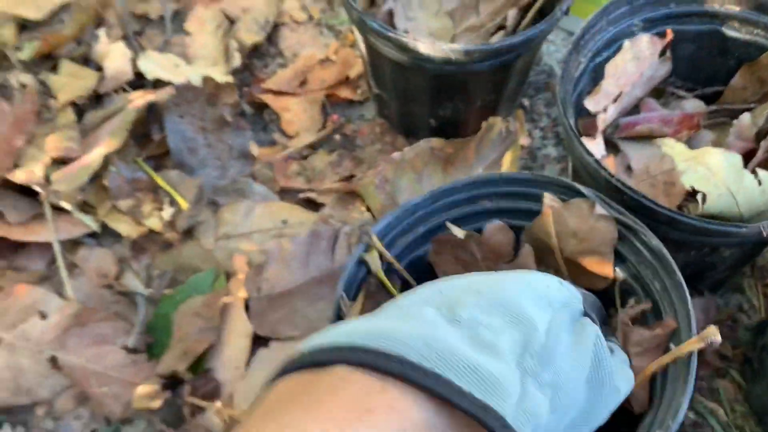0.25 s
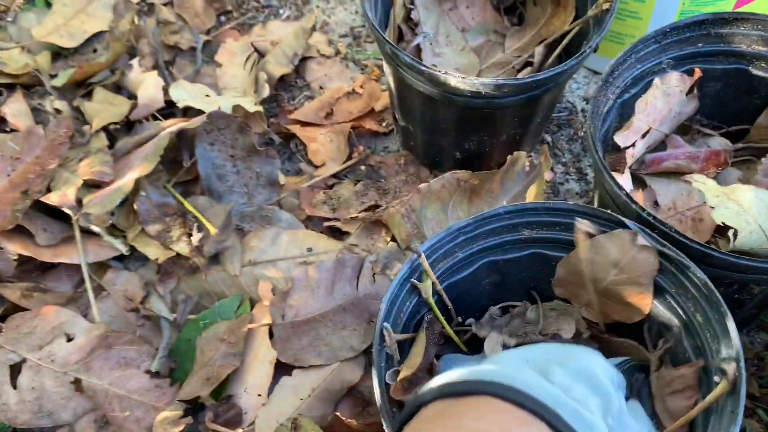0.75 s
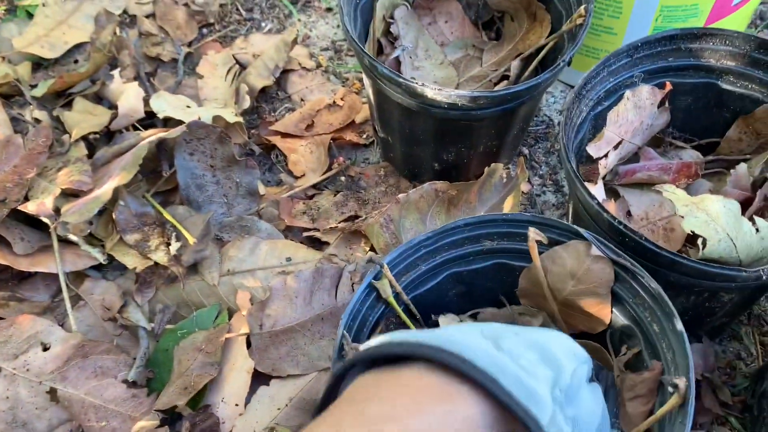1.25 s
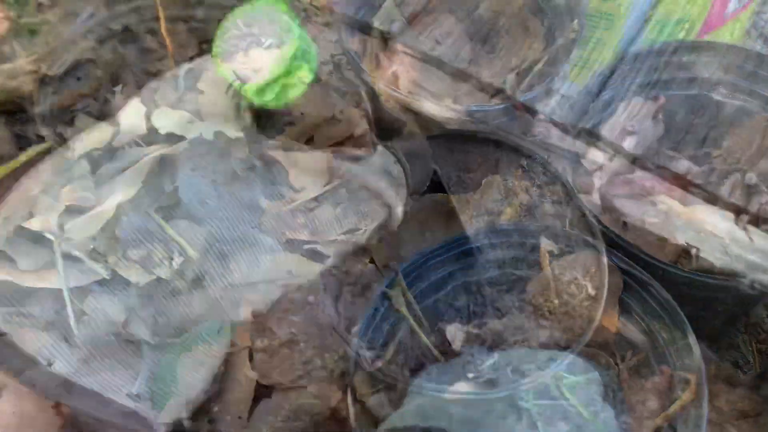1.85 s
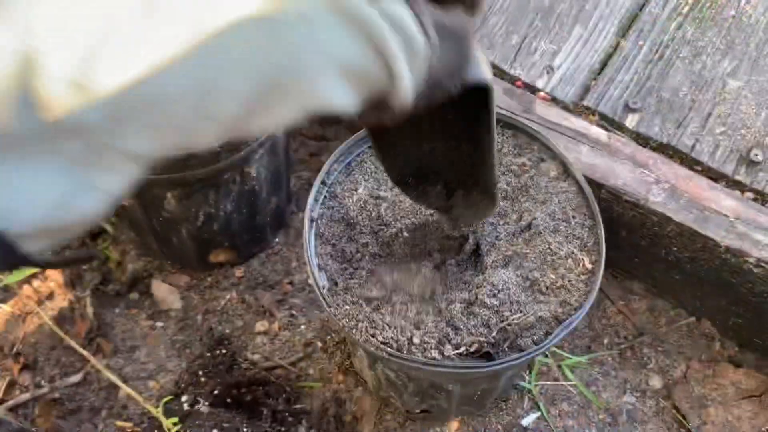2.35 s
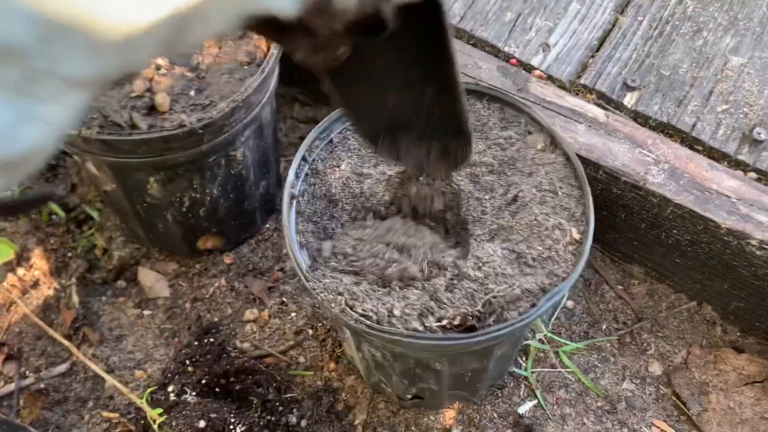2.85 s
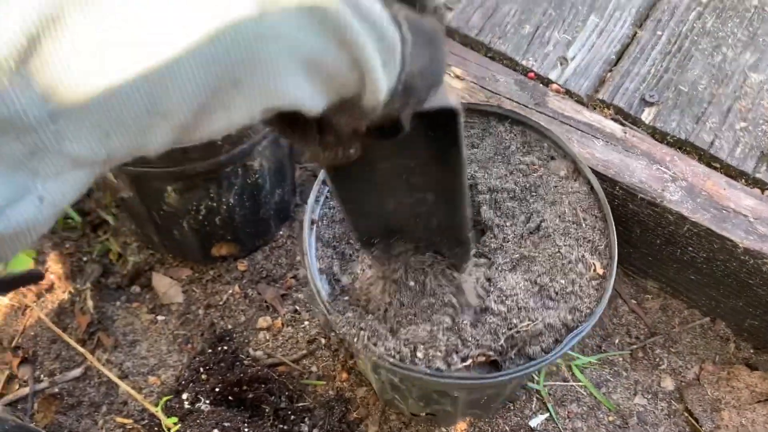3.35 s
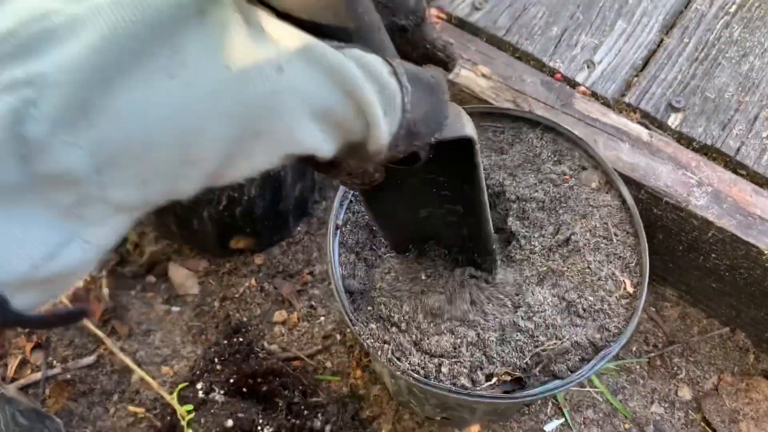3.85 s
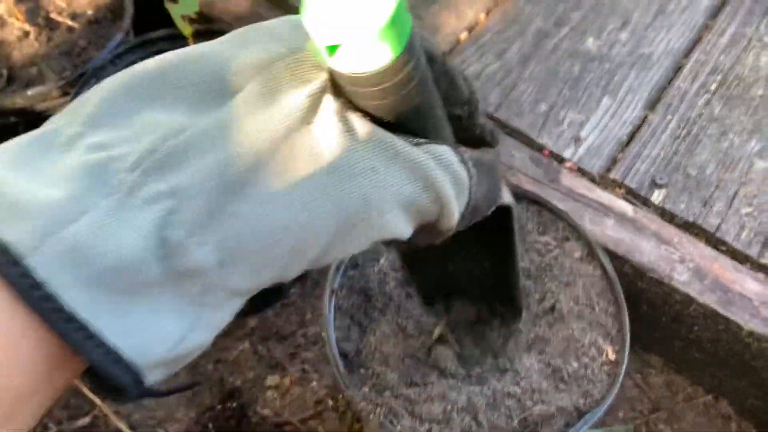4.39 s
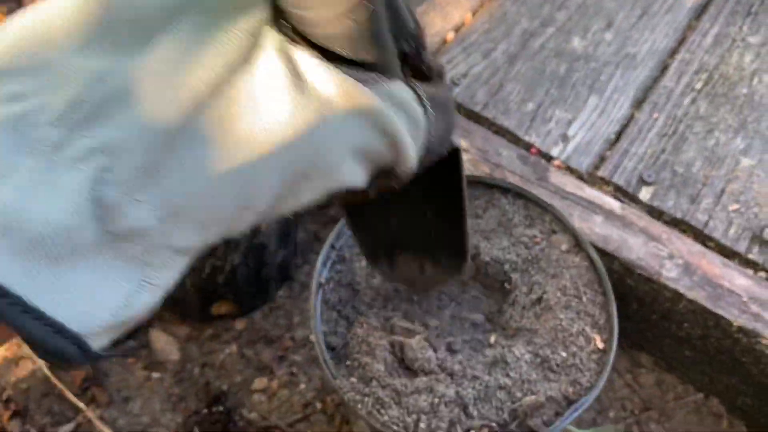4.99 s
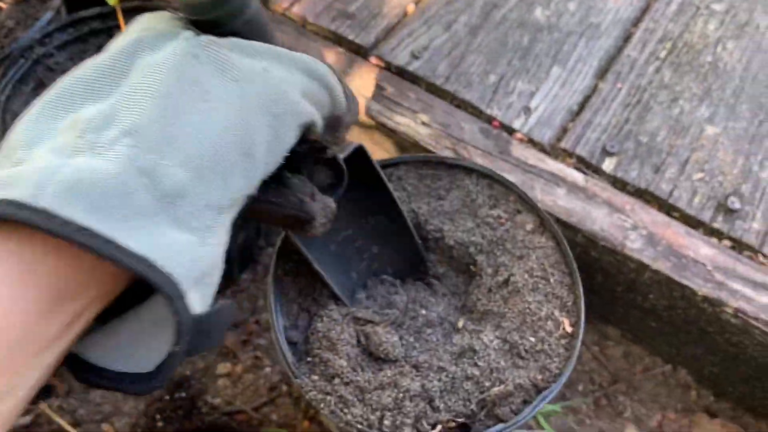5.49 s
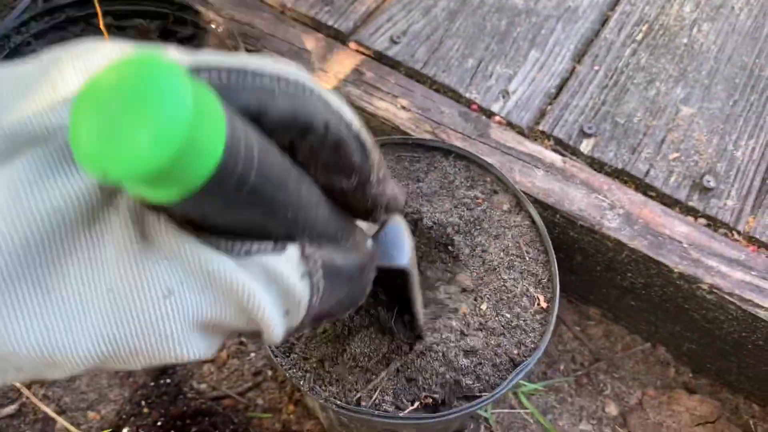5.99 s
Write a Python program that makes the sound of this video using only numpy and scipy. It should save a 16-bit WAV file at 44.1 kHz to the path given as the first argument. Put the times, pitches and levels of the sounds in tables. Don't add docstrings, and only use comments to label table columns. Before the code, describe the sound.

Close up outdoors, a gloved hand crushes dry leaves in a plastic pot, with fizzing, sharp snaps and a slightly hollow body over a low machine hum. After about two seconds the sound fades across to a steel trowel cutting sandy soil in separate gritty strokes, with pebble ticks and trickling sand. Faint birds and far traffic rumble sit behind. Phone-like stereo.

```python
import sys
import numpy as np
from scipy import signal
from scipy.fft import rfft, irfft, next_fast_len
from scipy.io import wavfile
from scipy.ndimage import uniform_filter1d, map_coordinates

SR = 44100
rng = np.random.default_rng(int(sys.argv[2]) if len(sys.argv) > 2 else 0)


def master_out(mix):
    frames = np.transpose(np.atleast_2d(mix))
    ceiling = np.clip(frames, -1, 1)
    pcm = np.round(ceiling * 32767).astype(np.int16)
    wavfile.write(sys.argv[1], SR, pcm)


def how_loud(loudness_db):
    steps = np.asarray(loudness_db, float) / 20
    return 10 ** steps


N = 274743


def unit(x):
    return x / np.sqrt(np.mean(x ** 2) + 1e-20)


def along(points, hz):
    f, value = np.transpose(points)
    return np.interp(np.log(hz + 1), np.log(f + 1), value)


def curves(rows):
    seconds, *columns = np.transpose(rows)
    return [np.interp(np.arange(N) / SR, seconds, column) for column in columns]


def fade(start_s, end_s):
    return np.clip((end_s - np.arange(N) / SR) / (end_s - start_s), 0, 1)


def wobble(rate):
    knots = rng.standard_normal(int(N * rate / SR) + 4)
    return map_coordinates(knots, [np.arange(N) * rate / SR])


def filtered(x, response):
    m = next_fast_len(N + SR // 4)
    return irfft(rfft(x, m) * response(np.fft.rfftfreq(m, 1 / SR)), m)[..., :N]


def band(x, lo_hz, hi_hz, ref_lo_hz, ref_hi_hz):
    hz, power = signal.welch(x[0], SR, nperseg=1024)
    inside = (hz > ref_lo_hz) & (hz < ref_hi_hz)
    ref = np.sqrt(power[inside].sum() * hz[1])
    return filtered(x, lambda f: 1 / (1 + (lo_hz / (f + 1)) ** 8) / (1 + (f / hi_hz) ** 8)) / ref


# frequency in Hz, lead of the left port in radians.
TREBLE_PORT_LEAD = [(7050, np.pi), (9350, 0), (11750, -np.pi), (14100, -2 * np.pi), (16400, -3 * np.pi)]


def ports(pair, lead, tilt, alike):
    lead_hz, lead_rad = np.transpose(lead + TREBLE_PORT_LEAD)

    def share(hz):
        angle = np.arccos(np.clip(along(alike, hz), 0, 1)) / 2
        return np.array([np.cos(angle), np.sin(angle)])

    def left_right(hz):
        balance = how_loud(along(tilt, hz) / 2 * (hz < TREBLE_PORT_LEAD[0][0]))
        half = balance * np.exp(.5j * np.interp(hz, lead_hz, lead_rad))
        return np.array([half, 1 / half])

    same, other = filtered(pair, share)
    return filtered(np.array([same + other, same - other]), left_right)


def whistle(rows):
    s, hz, db = np.transpose(rows)
    out = np.zeros(N)
    at = np.arange(max(int(s[0] * SR), 0), min(int(s[-1] * SR), N))
    phase = 2 * np.pi * np.cumsum(np.interp(at / SR, s, hz)) / SR
    out[at] = how_loud(np.interp(at / SR, s, db)) * np.sqrt(2) * np.sin(phase)
    return out


# frequency in Hz, density in dB per Hz.
RUMBLE_SPECTRUM = [(12, -42), (20, -12.5), (27, -48), (41, -6), (70, 2), (130, -2), (161, -19.5),
                   (229, -16), (300, -30), (390, -23.5), (660, -120)]
AIR_SPECTRUM = [(180, 0.0), (260, -5.6), (400, -14.2), (700, -21.5), (1100, -24.4), (1800, -30.9),
                (2400, -30.9), (4500, -37.4), (5600, -40.9), (7000, -40.8), (9000, -40.3), (11000, -42.7),
                (13500, -45.2), (15200, -48.2)]
# time in seconds, level in dB.
TRAFFIC_LEVEL = [(0.0, -53), (0.07, -40.5), (0.35, -47), (0.47, -44), (2.48, -49.5), (2.85, -45.5),
                 (2.98, -50), (3.49, -46), (4.68, -49), (5.43, -47), (6.23, -48)]
# time in seconds, pitch in Hz, level in dB.
MACHINE_HUM = [(0.0, 60.4, -54), (0.03, 57.43, -47), (1.4, 57.8, -45), (2.09, 58.7, -55), (2.2, 55.9, -65)]
# frequency in Hz, left over right in dB.
AIR_BALANCE = [(60, -2.4), (200, -2.2), (500, -1), (2000, -.5)]
# frequency in Hz, likeness from 0 to 1.
AIR_LIKENESS = [(60, .98), (130, .87), (300, .6), (600, .15), (5000, .3), (7000, .88), (9000, .97)]


def background():
    rumble = unit(filtered(rng.standard_normal((2, N)), lambda hz: how_loud(along(RUMBLE_SPECTRUM, hz))))
    air_shape = lambda hz: how_loud(along(AIR_SPECTRUM, hz)) * (hz > 150) * (hz < 15150)
    air = unit(filtered(rng.standard_normal((2, N)), air_shape))
    traffic = how_loud(curves(TRAFFIC_LEVEL)[0] - 1.5) * rumble
    first_scene_db = 4 * fade(1.3, 1.87)
    bed = traffic + how_loud(-60 + first_scene_db + 0.4 * wobble(2.46)) * air
    hum = whistle(MACHINE_HUM) * fade(1.64, 2.36)
    hum_balance = how_loud(np.array([[-1.4], [1.4]]))
    return ports(bed, [(0, 0), (4700, 0)], AIR_BALANCE, AIR_LIKENESS) + hum * hum_balance


# time in seconds, pitch in Hz, level in dB.
BIRD_SLURS = [
    [(1.33, 3200, -85), (1.37, 3113, -77), (1.46, 3080, -80), (1.5, 3060, -88)],
    [(3.27, 4050, -79), (3.31, 3730, -78), (3.37, 3360, -74), (3.42, 3080, -73.5), (3.49, 3030, -94),
     (3.55, 3060, -92)],
    [(3.89, 3290, -75), (3.93, 3270, -89), (4.01, 3200, -88), (4.06, 3200, -86)],
    [(6.13, 4300, -90), (6.17, 4070, -84), (6.22, 4370, -84)],
]
# start in seconds, level in dB, pitch factor.
BIRD_CHIRPS = [
    (4.28, -74, 1.03),
    (4.447, -73.5, 1.02),
    (4.613, -73.5, 1.04),
    (4.784, -73.5, 1),
    (5.615, -76, 1.05),
    (5.781, -77, 1.15),
    (5.985, -80, 1.34),
    (6.084, -75, 1.24),
]
# start in seconds, length in seconds, first pitch in Hz, last pitch in Hz, level in dB.
CHIRP_GLIDES = [
    (0, .035, 2990, 1953, 4.5),
    (0.009, 0.04, 3044, 2810, -4),
]


def birds():
    song = sum(whistle(rows) for rows in BIRD_SLURS)
    for s, db, pitch in BIRD_CHIRPS:
        for start, length, from_hz, to_hz, voice_db in CHIRP_GLIDES:
            u = np.linspace(0, 1, 5)
            shape = voice_db - 2.0 - 40 * (u - .5) ** 2
            glide = pitch * (from_hz + (to_hz - from_hz) * u)
            song += whistle(np.transpose([s + start + length * u, glide, db + shape]))
    song = song * (1 + .9 * np.array([wobble(220), wobble(220)]))
    garden_t60 = 0.27
    decay = how_loud(-60 * np.arange(SR // 2) / SR / garden_t60)
    tail = rng.standard_normal((2, SR // 2)) * decay
    echo = signal.fftconvolve(song, tail / np.linalg.norm(tail[0]), axes=1)[:, :N]
    return song + how_loud(6.0) * echo


def chips(count, spread_db, cycles):
    at, pitch, size, *phases = rng.random((count, 5)).T
    hz = 450 * 33 ** pitch[:, None]
    t = np.arange(SR // 150) / SR
    size_db = -spread_db * np.log(size + 0.15)[:, None]
    fall = hz * how_loud(size_db - 60 * t * hz / cycles) * (1 - t / t[-1])
    where = ((at * N).astype(int)[:, None] + np.arange(len(t))).ravel()
    rings = [fall * np.sin(2 * np.pi * (hz * t + phase[:, None])) for phase in phases]
    return unit(np.array([np.bincount(where, ring.ravel(), N)[:N] for ring in rings]))


def patchy(x, depth_db):
    z = signal.stft(x, nperseg=512)[2]
    field = uniform_filter1d(rng.standard_normal(z.shape[1:]), size=3, axis=0)
    field = uniform_filter1d(field, size=4, axis=1)
    return signal.istft(z * how_loud(depth_db * unit(field)), nperseg=512)[1][:, :N]


def crunch(spectrum, rate, spread_db, life, clump_db, smooth, pieces):
    size_db = spread_db * np.minimum(rng.exponential(size=N), 2.6)
    hits = (rng.random(N) < rate / SR) * how_loud(size_db)
    grains = signal.fftconvolve(hits, how_loud(-60 * np.arange(SR // 30) / SR / life))[:N]
    bursts = (unit(abs(grains)) + smooth) * rng.standard_normal((2, N))
    clumped = patchy(bursts + pieces, depth_db=1.87) * how_loud(clump_db * wobble(45))
    return filtered(clumped, lambda hz: how_loud(along(spectrum, hz)))


def strokes(rows, rise, fall, follows=1, over_db=0, body=0):
    t = np.arange(0, N + 64, 32) / SR
    s, length, start_db, end_db, body_db = np.transpose(rows)[:, :, None]
    u = np.clip((t - s) / length, 0, 1)
    away = np.maximum(0, np.maximum((s - t) / rise, (t - s - length) / fall))
    top_db = np.maximum(start_db, end_db)
    swell_db = 20
    under_db = top_db - start_db - (end_db - start_db) * u + swell_db * away
    power = how_loud(top_db + body * body_db + over_db - follows * under_db) ** 2
    return np.interp(np.arange(N) / SR, t, np.sqrt(power.sum(axis=0)))


def snaps(events, lift_db, ring_lift_db, life):
    before = SR // 100
    out = np.zeros((2, N + SR))
    t = np.arange(-before, SR // 40) / SR
    bright = signal.butter(2, [4600, 13400], "band", fs=SR)
    after = np.maximum(t, 0)
    fall = how_loud(-60 * after / life) * (1 - np.exp(-after / 0.00028))
    lead_in = how_loud(-22) * np.exp(-abs(t) / 0.0022)
    for s, db, hz, ring_db in events:
        noise = rng.standard_normal((4, len(t)))
        crack = signal.lfilter(*bright, noise[:2]) * (fall + lead_in)
        crack = .55 * crack / abs(crack).max(axis=1, keepdims=True)
        drift = 0.21 * np.cumsum(noise[2:], axis=1)
        ring = np.sin(2 * np.pi * hz * t + drift) * (np.sqrt(fall) + lead_in)
        both = crack + how_loud(ring_db + ring_lift_db) * ring
        out[:, round(s * SR):][:, :len(t)] += how_loud(db + lift_db) * both
    return out[:, before:N + before]


# frequency in Hz, density in dB per Hz.
LEAF_SPECTRUM = [(300, -7.6), (500, -4.7), (900, -.5), (1300, -5), (2000, -3.5), (2700, -7.5), (3500, -3.5),
                 (4600, -5.0), (5600, -10.7), (7000, -8.2), (9000, -8.9), (11000, -9.7), (13500, -15.3),
                 (15400, -17.9)]
# start in seconds, length in seconds, fizz at the start in dB,
# fizz at the end in dB, pot body over fizz in dB.
GLOVE_SQUEEZES = [(0.0, 0.23, -60, -64, 3.5), (0.15, 0.15, -56.5, -58, 8), (0.35, 0.12, -52, -44, 4),
                  (0.49, 0.081, -48.5, -47.5, 4.5), (0.59, .12, -47.5, -38.5, 3.5),
                  (0.72, 0.033, -43.5, -49, 6.5), (0.77, 0.1, -49.5, -72, 6), (0.87, 0.094, -61.5, -55, 7),
                  (0.98, 0.096, -52, -52, 3), (1.05, 0.038, -58.5, -55.5, 7), (1.1, 0.13, -48.5, -55.5, 6),
                  (1.345, 0.023, -70.5, -71, 10), (1.435, 0.15, -69, -64, 8), (1.58, 0.2, -64, -72, -1),
                  (1.79, 0.39, -71, -77.5, 3)]
# time in seconds, peak in dB, ring in Hz, ring over peak in dB.
LEAF_SNAPS = [(0.0965, -34.5, 1810, -11), (0.1573, -38, 3000, 10.5), (0.2214, -47, 3560, 10),
              (0.2215, -29.5, 2120, 0.5), (0.314, -34.5, 1790, -16.5), (0.3486, -46.5, 2040, 15.5),
              (0.395, -34, 1650, -12), (0.4426, -22, 1970, -5), (0.471, -29.5, 1590, -13.5),
              (0.5038, -34.5, 3880, 10), (0.5203, -17, 3580, -1.5), (0.5503, -16, 3480, -6.5),
              (0.6125, -22.5, 2060, -11.5), (0.6933, -18.5, 1450, -16.5), (0.708, -22.5, 4470, -1),
              (0.7213, -27.5, 4590, 1.5), (0.7365, -23.5, 4230, -8), (0.7616, -30, 4560, -9.5),
              (0.7937, -31.5, 4140, 1.5), (0.817, -37.5, 4000, 3.5), (0.9572, -33.5, 3400, -1),
              (1.069, -29, 1623, -28), (1.1099, -36.5, 3220, -14), (1.1722, -28.5, 2110, -25),
              (1.2368, -25, 1580, -11.5), (1.4447, -45.5, 2130, -8), (1.5575, -35.5, 3100, -8.5),
              (1.6102, -33, 1830, -11), (1.6554, -28, 2110, -19), (2.0409, -44, 3120, -18)]
LEAF_CRACKLES = [(0.062, -44, 5200, 5), (0.1314, -50, 3070, -7), (0.1446, -40, 2990, -11),
                 (0.274, -44, 4450, -7), (0.4203, -29, 4590, -7), (0.483, -27.5, 3740, -19),
                 (0.5581, -24, 4430, -1), (0.5664, -30, 4490, -14), (0.628, -27, 4540, -2),
                 (0.6397, -23, 4770, -6), (0.655, -27, 4500, -11), (0.6889, -31, 4600, -9),
                 (0.7699, -36, 4300, -5), (0.7787, -24, 4520, -5), (0.8223, -36, 3820, -7),
                 (0.855, -53, 3630, -9), (0.8934, -46, 4370, -7), (0.9842, -39, 4370, -2),
                 (1.057, -41, 4410, -11), (1.0793, -26, 3040, -13), (1.0906, -33, 4130, -1),
                 (1.1158, -27, 4100, -7), (1.1374, -32, 3740, -14), (1.1774, -26, 2570, -13),
                 (1.2186, -28, 4700, -20), (1.2413, -30, 4550, -3), (1.2634, -51, 4450, -7),
                 (1.2885, -51, 2540, -3), (1.3374, -56, 4440, 0), (1.5177, -43, 2620, -7)]
# frequency in Hz, then lead of the left port in radians,
# left over right in dB, or likeness from 0 to 1.
LEAF_PORT_LEAD = [(0, 0), (2400, .1), (3000, 1.7), (4500, .3), (5200, 1.3), (5800, 3.9)]
LEAF_BALANCE = [(60, 10.5), (180, -3), (550, -2.5), (1650, 0), (4970, -3.5), (15000, -14)]
LEAF_LIKENESS = [(500, .88), (2000, .95), (2800, .3), (4500, .75), (5300, .3), (7000, .9), (9000, .92)]


def leaves(pieces):
    squeeze = lambda **layer: strokes(GLOVE_SQUEEZES, rise=0.036, fall=0.059, **layer)
    x = crunch(LEAF_SPECTRUM, rate=350, spread_db=4.5, life=.004, clump_db=.9, smooth=1.4, pieces=.95 * pieces)
    body = squeeze(follows=0.83, body=1) * band(x, 250, 2700, 500, 2400)
    crackle = squeeze(follows=0.87, over_db=-1.76, body=0.25) * band(x, 2700, 6000, 3000, 5000)
    fizz = squeeze() * band(x, 6000, 17000, 7500, 14000)
    hand = body + crackle + fizz
    hand += snaps(LEAF_SNAPS, lift_db=4.5, ring_lift_db=-3.0, life=0.0047)
    hand += snaps(LEAF_CRACKLES, lift_db=4.5, ring_lift_db=-4.5, life=0.0031)
    return ports(hand, LEAF_PORT_LEAD, LEAF_BALANCE, LEAF_LIKENESS)


# frequency in Hz, density in dB per Hz.
SOIL_SPECTRUM = [(300, -3.8), (500, -8.0), (900, -6.8), (1300, -9.1), (2000, 0.0), (2700, -1.6),
                 (3500, -2.2), (4600, -5.7), (5600, -7.1), (7000, -2.2), (9000, -1.5), (11000, -1.6),
                 (13500, -5.3), (15400, -10.0)]
# frequency in Hz, width in Hz, boost in dB.
BLADE_MODES = [
    (1720, 47, 6),
    (2350, 300, 4.5),
    (3200, 740, 2),
]
# start in seconds,
# length in seconds, grit at the start in dB, grit at the end in dB, pot body over grit in dB.
BLADE_DIGS = [(1.637, 0.11, -47.5, -50, -13), (2.305, 0.058, -52, -43.5, -16.5),
              (2.365, 0.067, -46.5, -52, -11), (2.615, 0.015, -56, -49, -29),
              (2.815, 0.11, -65, -38.5, -15), (3.562, 0.035, -53.5, -43.5, -10),
              (3.65, 0.09, -60.5, -51, -14.5), (3.735, 0.13, -55, -58, -8.5),
              (4.09, 0.035, -62.5, -51.5, -12), (4.14, 0.028, -48, -43.5, -17),
              (4.232, 0.12, -58, -62.5, -8.5), (4.955, .025, -55, -54, -12.5),
              (4.985, .02, -43.5, -40.5, -17.5), (5.01, 0.11, -38.5, -51, -11), (5.11, 0.063, -58, -61, -6),
              (5.87, 0.082, -71, -56, -6)]
SAND_SLIDES = [(1.871, 0.053, -60, -58, -10.5), (1.917, 0.086, -67, -61, -9),
               (2.051, 0.022, -59.5, -60, -14), (2.279, .02, -58.5, -72, -22),
               (2.493, 0.068, -72, -62.5, -5), (2.639, .028, -68, -75.5, -1),
               (2.984, 0.076, -63.5, -71, -10.5), (3.065, 0.16, -63, -63.5, -10.5),
               (3.228, 0.057, -68.5, -73.5, -6), (4.38, 0.14, -70.5, -76, -1),
               (4.617, 0.079, -78.5, -74.5, 1), (5.188, 0.11, -60.5, -59, -9), (5.324, 0.17, -71, -75.5, 0),
               (5.469, 0.22, -65, -79.5, 0), (3.89, 0.23, -83, -80.5, 0), (5.708, 0.12, -66.5, -72.5, -7),
               (5.97, .22, -76.5, -81.5, 4.5)]
# start in seconds, length in seconds,
# start level in dB, end level in dB, body in dB.
BLADE_SINGS = [
    (2.83, 0.041, -56, -62, 0),
    (4.022, 0.16, -64.5, -67, 0),
]
# time in seconds, peak in dB, ring in Hz, ring over peak in dB.
PEBBLE_TICKS = [(2.3062, -31.5, 3610, -9.5), (2.3556, -23, 2290, -17), (2.515, -41, 2110, -27),
                (2.5355, -54.5, 2250, 12), (2.612, -56, 1670, -17), (2.631, -37.5, 1770, -9.5),
                (2.8132, -35, 1720, -15.5), (2.832, -54, 1800, -1), (2.9156, -24, 2064, -7),
                (3.1562, -42, 1720, -21), (3.5602, -26, 2110, -8.5), (3.5681, -30, 1510, -3),
                (3.5903, -32, 2300, -3), (3.601, -46.5, 2600, 18), (3.789, -38, 2100, -20),
                (5.03, -43.5, 2130, 15.5), (2.492, -60, 2300, 6), (3.776, -19, 2830, -25),
                (3.8016, -16, 2000, -22), (3.839, -34.5, 1720, -0.5), (4.0223, -66.5, 1720, 14),
                (4.157, -25.5, 4400, -12), (4.2356, -43.5, 1660, -2.5), (4.9068, -39.5, 1720, -5),
                (4.9377, -51, 1720, 4), (4.9837, -40, 2100, -25), (5.0272, -20.5, 2200, -7.5),
                (5.0566, -22.5, 2870, -11), (5.227, -38, 2660, -17), (5.3565, -34.5, 3100, -4.5),
                (5.713, -43, 1480, -25), (5.7408, -40, 1320, -13), (5.7785, -36.5, 2640, -16),
                (6.0512, -58, 2870, 15)]
GRAIN_CATCHES = [(1.8794, -45, 1820, -7), (2.055, -47.5, 1890, -6), (2.2846, -39, 1510, -13),
                 (2.3152, -34.5, 1870, -11), (2.3454, -26, 2120, -9), (2.3644, -29, 2050, -5),
                 (2.4064, -37.5, 2140, -10), (2.8375, -28, 2000, -4), (2.902, -40, 2000, -8),
                 (2.9344, -37, 2170, -8), (3.703, -39, 1940, -17), (3.715, -28, 2960, -8),
                 (3.7187, -41, 3030, -12), (3.7344, -34, 1960, -5), (3.8294, -37, 1670, 6),
                 (3.85, -24, 1700, 0), (4.1041, -43, 1710, -8), (4.1164, -44, 1700, -16),
                 (4.1794, -42, 2410, -8), (4.2941, -38, 2400, -12.5), (4.3624, -51.5, 2370, -8),
                 (5.069, -35, 2500, 0), (5.0834, -39, 3150, -2), (5.1414, -43, 2050, -8),
                 (5.179, -55, 1720, -3), (5.487, -43, 2450, -8), (5.578, -42, 1560, -8),
                 (5.8112, -40.5, 2240, -15)]
# frequency in Hz, then lead of the left port in radians,
# left over right in dB, or likeness from 0 to 1.
SOIL_PORT_LEAD = [(0, 0.46), (900, 1.25), (1900, 1.28), (3500, 2.29), (5000, 1.9), (6000, 3.4)]
SOIL_BALANCE = [(60, 0.5), (180, 38), (550, 2.5), (1650, -0.4), (4970, -2), (15000, -14.5)]
SOIL_LIKENESS = [(500, .6), (2000, .78), (4000, .7), (5000, .45), (7000, .9), (9000, .92)]


def soil(pieces):
    moves = dict(rise=0.015, fall=0.032)
    push = lambda **layer: strokes(BLADE_DIGS + SAND_SLIDES, **moves, **layer)
    x = crunch(SOIL_SPECTRUM, rate=350, spread_db=4.5, life=.003, clump_db=1.1, smooth=1.9, pieces=.8 * pieces)
    modes = lambda f: how_loud(sum(db / (1 + (2 * (f - hz) / width) ** 2) for hz, width, db in BLADE_MODES))
    steel = filtered(x, modes)
    body = push(follows=0.89, body=1) * band(x, 450, 1500, 600, 1400)
    blade = push(follows=0.93, over_db=4.5, body=0.69) * band(steel, 1500, 5500, 1600, 4500)
    grit = push() * band(x, 5500, 17000, 7500, 14000)
    singing = strokes(BLADE_SINGS, **moves) * band(steel, 1600, 1850, 1600, 1850)
    scrape = body + blade + grit + singing
    scrape += snaps(PEBBLE_TICKS, lift_db=3.5, ring_lift_db=-3.5, life=0.0041)
    scrape += snaps(GRAIN_CATCHES, lift_db=-3.0, ring_lift_db=-8, life=0.0075)
    return ports(scrape, SOIL_PORT_LEAD, SOIL_BALANCE, SOIL_LIKENESS)


def scene():
    pieces = chips(count=5200, spread_db=6.0, cycles=450)
    return background() + birds() + leaves(pieces) + soil(pieces)


# frequency in Hz, distance in dB.
DROP_UNDER = [(4000, 9.5), (7000, 11.5), (9300, 11), (11700, 6), (14000, 7.5), (15000, 12)]


def joint(x, waver_db, quiet_top_db):
    sum_and_difference = np.array([x[0] + x[1], x[0] - x[1]]) / 2
    hz, _, z = signal.stft(sum_and_difference, SR, nperseg=1024)
    power = abs(z[:, :512].reshape(2, 64, 8, -1)) ** 2
    level = 10 * np.log10(uniform_filter1d(power.mean(axis=2), size=3, axis=2) + 1e-20)
    centre = hz[4:512:8, None]
    own = uniform_filter1d(rng.standard_normal(level.shape[1:]), size=4, axis=0)
    own = uniform_filter1d(own, size=5, axis=1)
    common = uniform_filter1d(rng.standard_normal(level.shape[2]), size=4)
    waver = waver_db * unit(common / 2 + unit(own) / 3 * (centre < 7500))
    keep = (level > level[::-1] - along(DROP_UNDER, centre) + waver) | (centre < 3200)
    keep &= (centre < 15200) | (level > quiet_top_db)
    z[:, :512] *= np.repeat(keep, 8, axis=1)
    mid, side = signal.istft(z, SR, nperseg=1024)[1][:, :N]
    return np.array([mid + side, mid - side])


def top_cut(x):
    return signal.sosfilt(signal.butter(12, 16490, fs=SR, output="sos"), x)


def record(dry):
    limited = filtered(dry, lambda hz: (hz < 16450) * how_loud(-np.clip(hz - 16000, 0, 400) / 16))
    mix = joint(limited, waver_db=3.3, quiet_top_db=-93)
    return top_cut(mix)


dry = scene()
out = record(dry)
master_out(out)
```